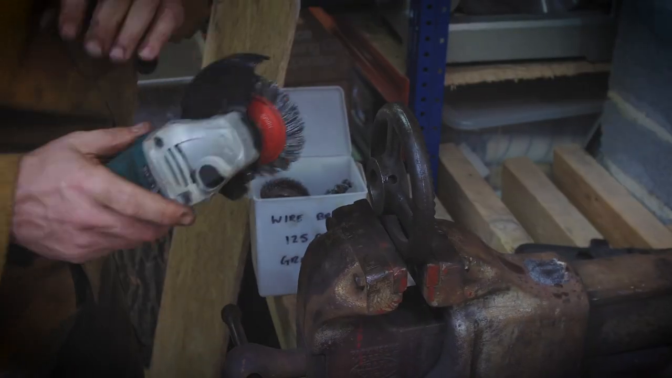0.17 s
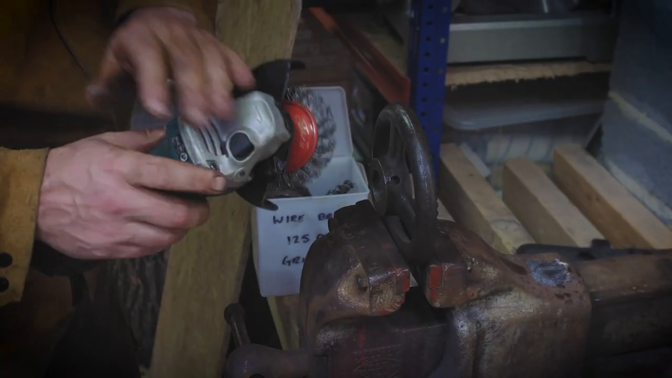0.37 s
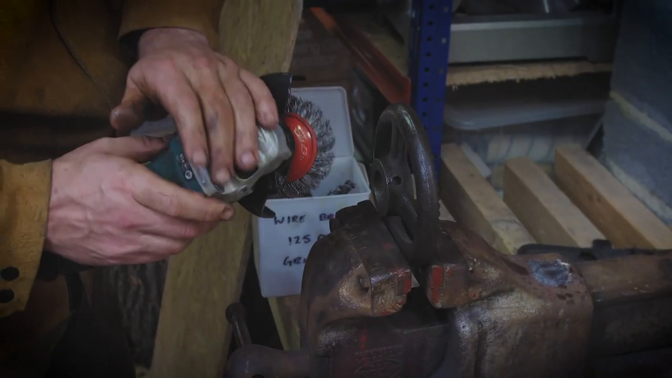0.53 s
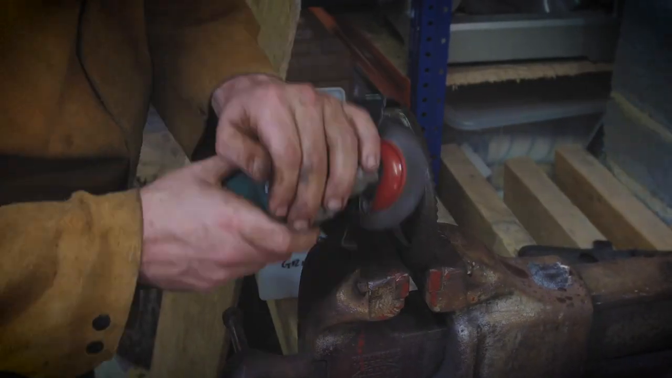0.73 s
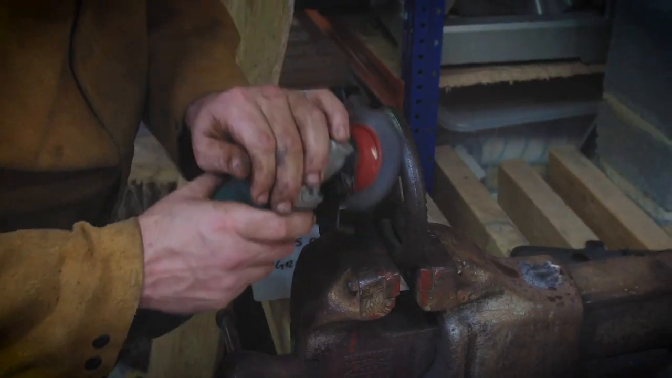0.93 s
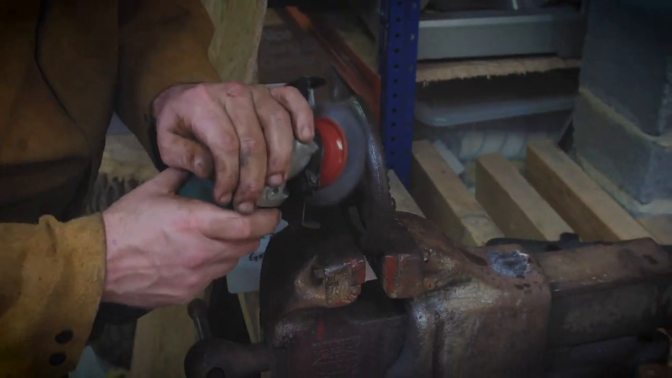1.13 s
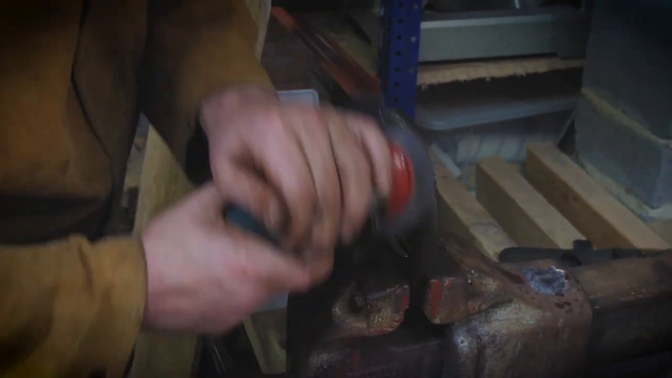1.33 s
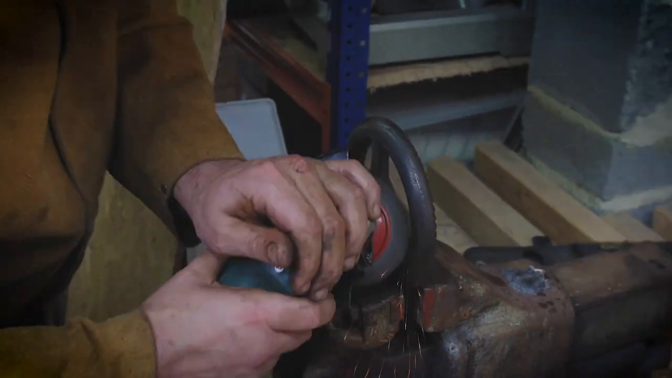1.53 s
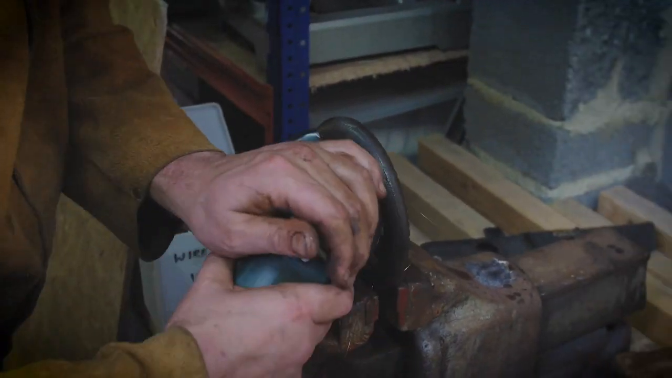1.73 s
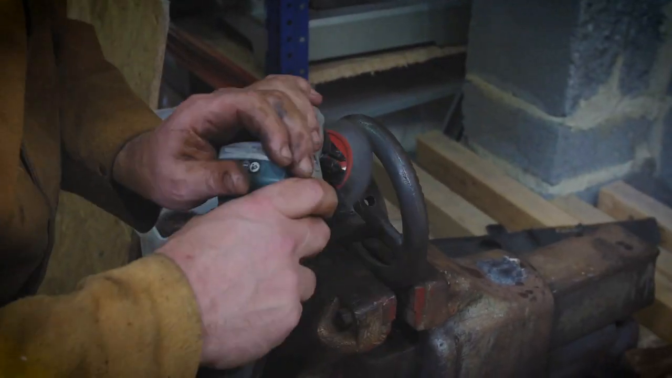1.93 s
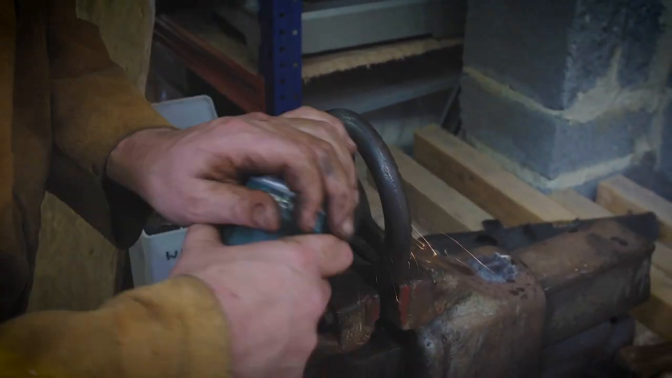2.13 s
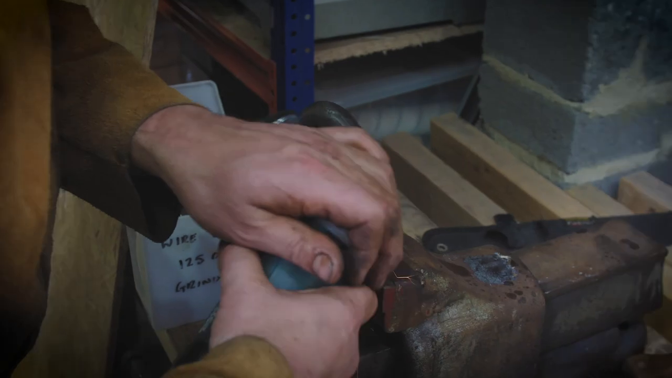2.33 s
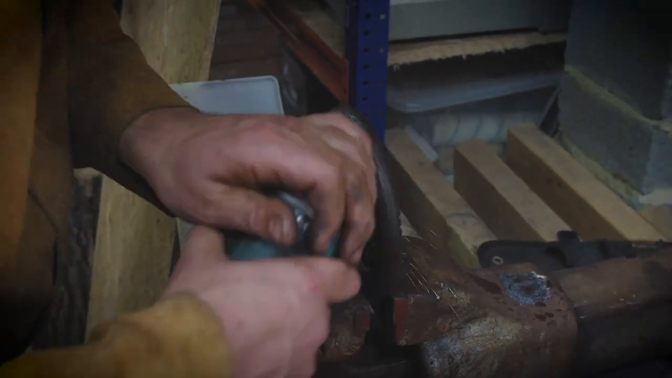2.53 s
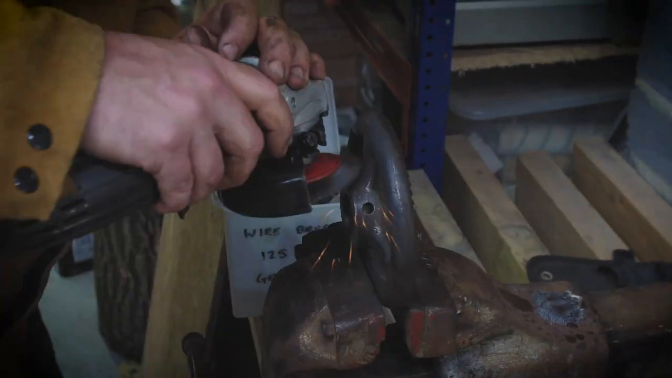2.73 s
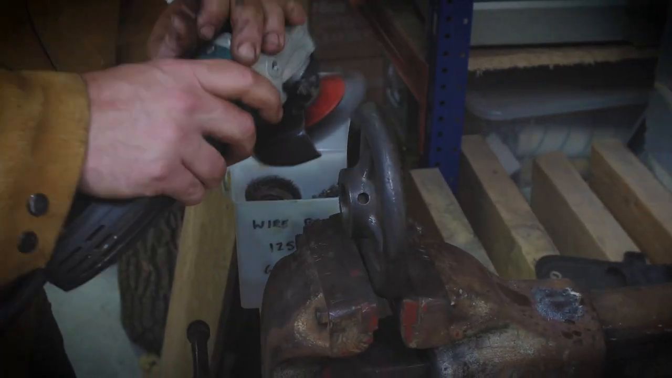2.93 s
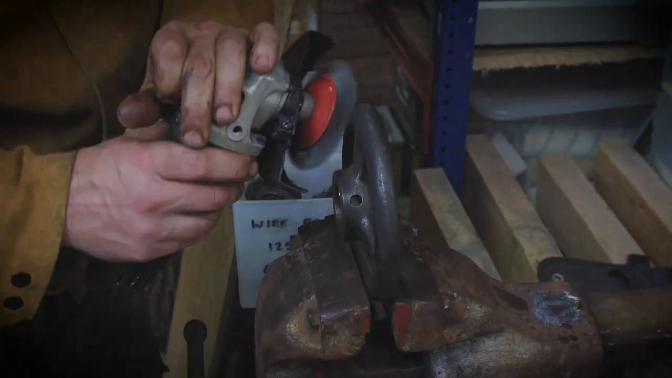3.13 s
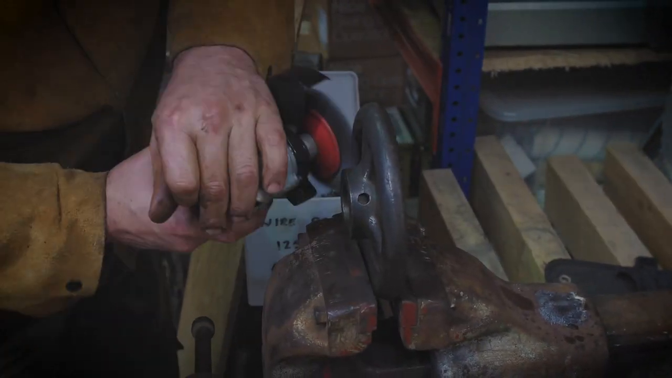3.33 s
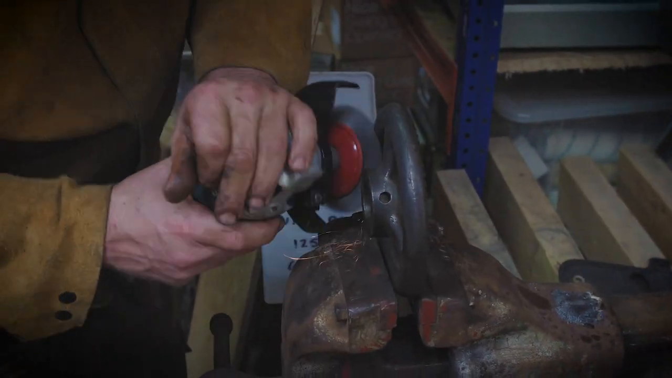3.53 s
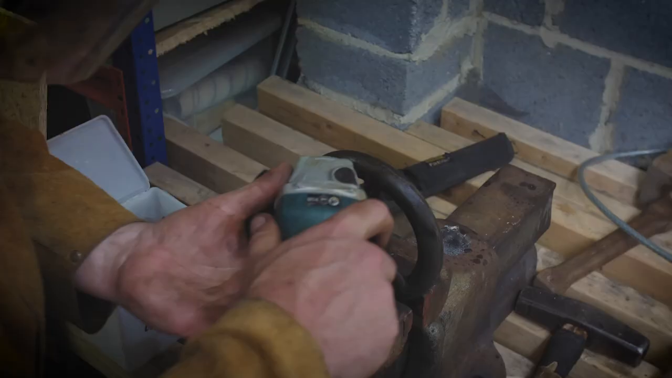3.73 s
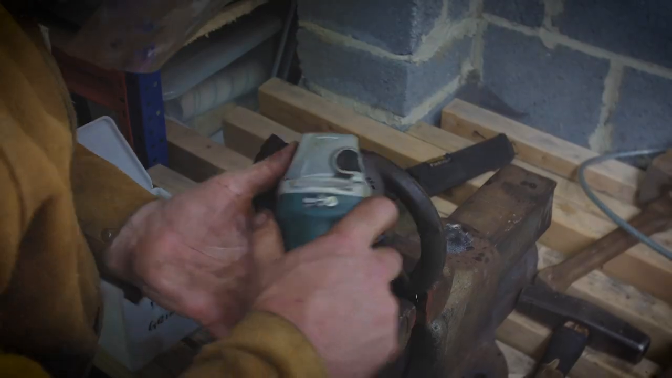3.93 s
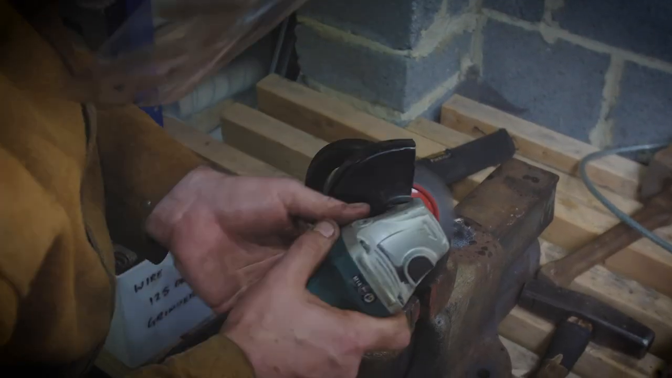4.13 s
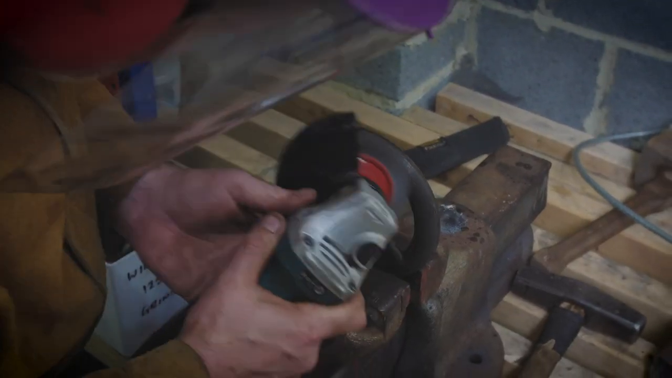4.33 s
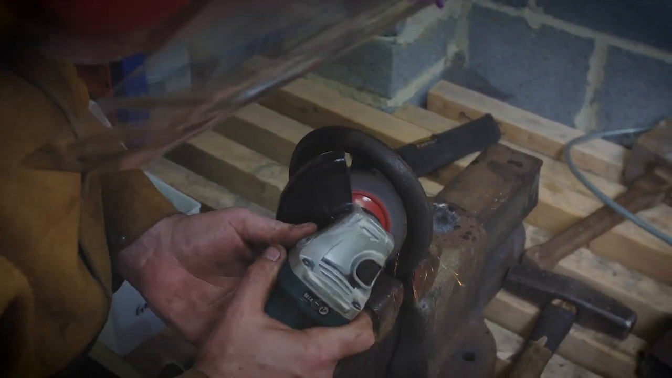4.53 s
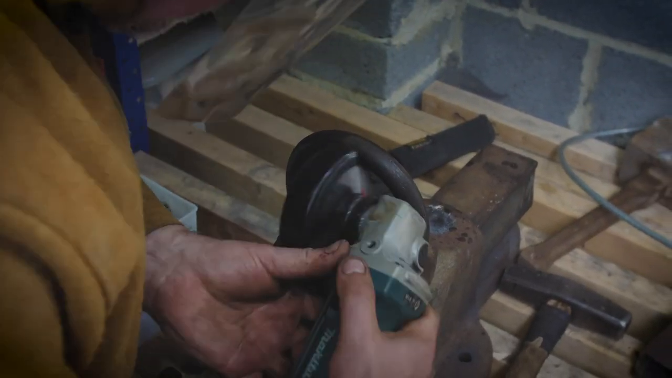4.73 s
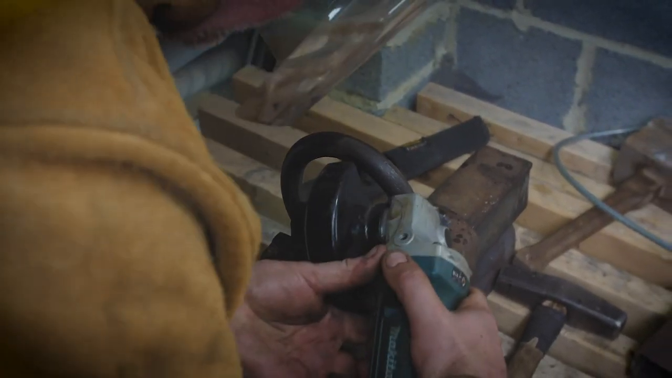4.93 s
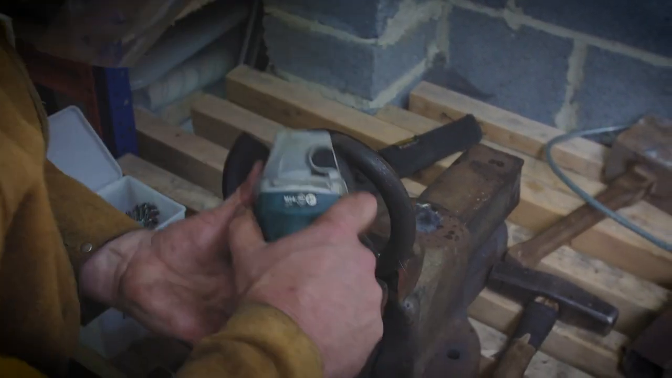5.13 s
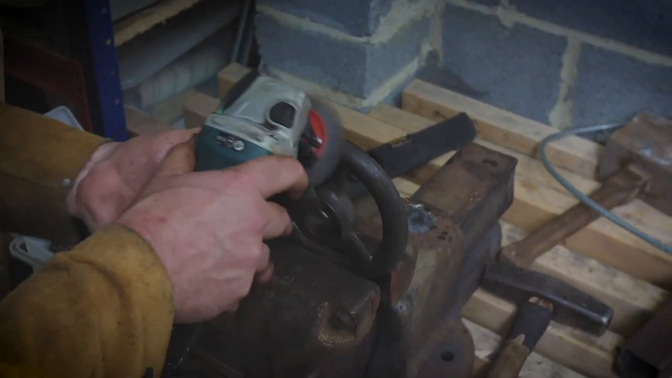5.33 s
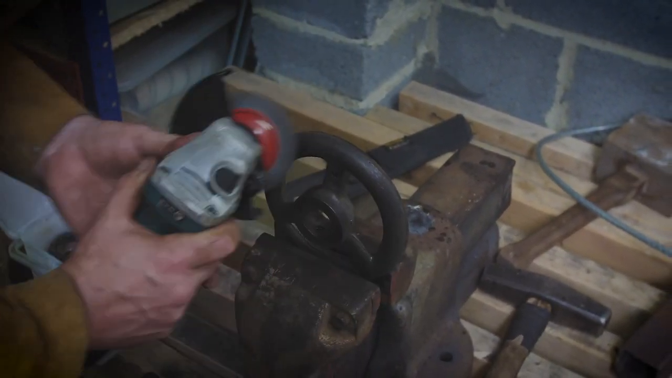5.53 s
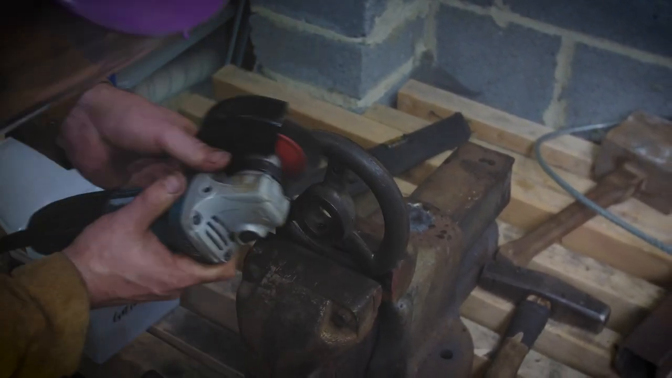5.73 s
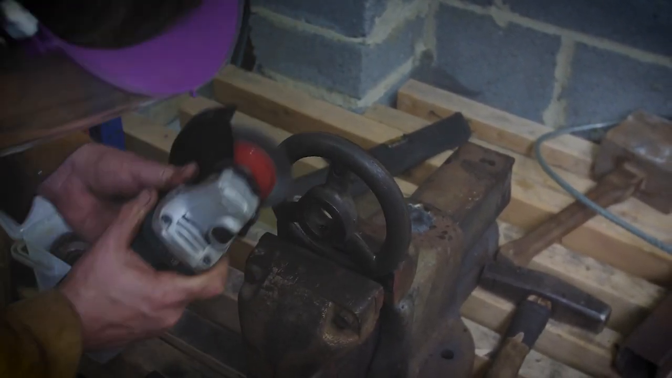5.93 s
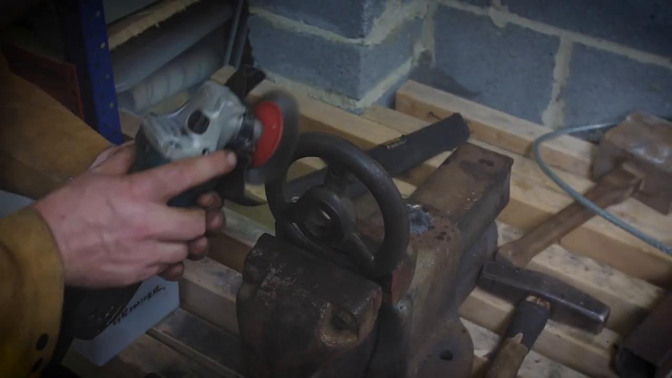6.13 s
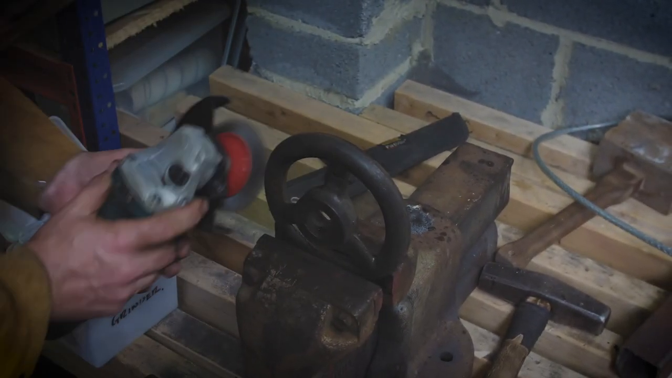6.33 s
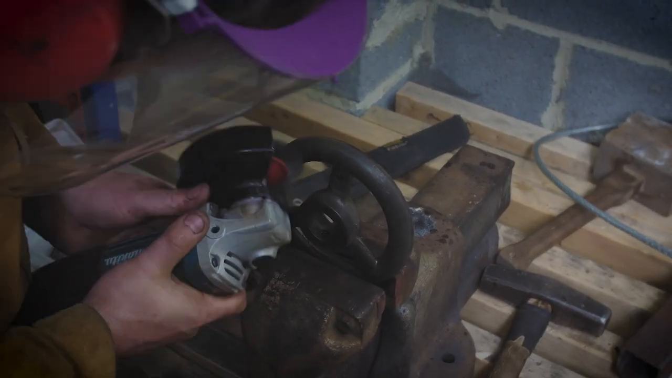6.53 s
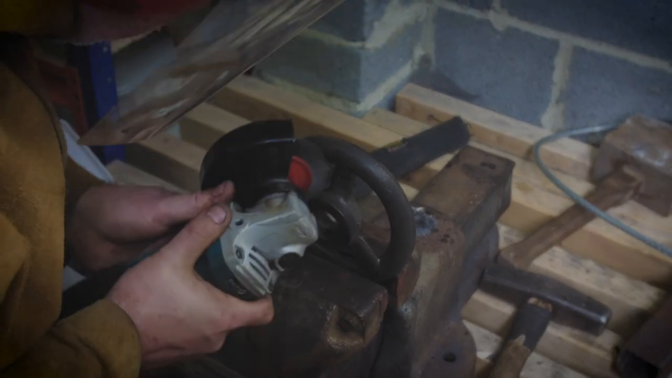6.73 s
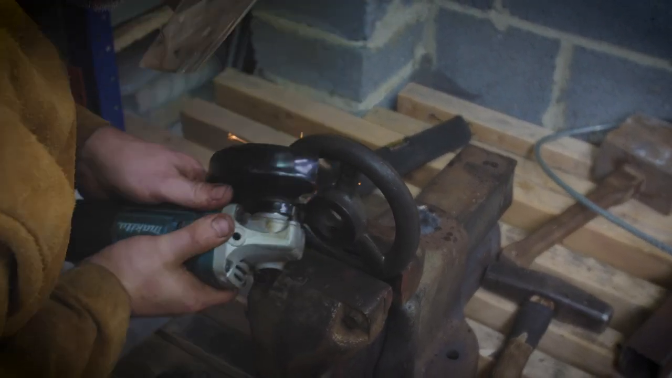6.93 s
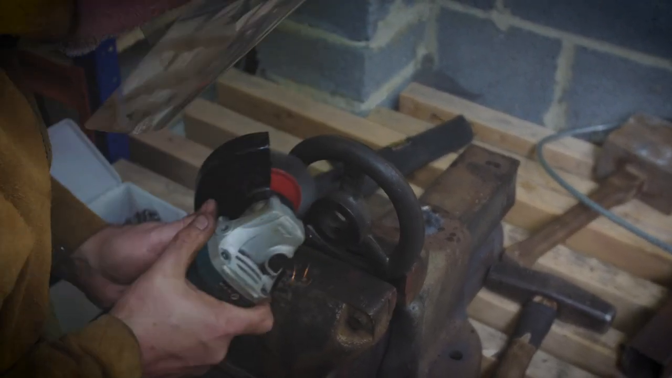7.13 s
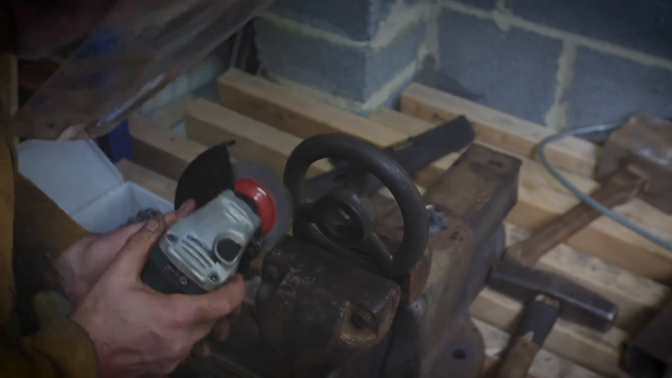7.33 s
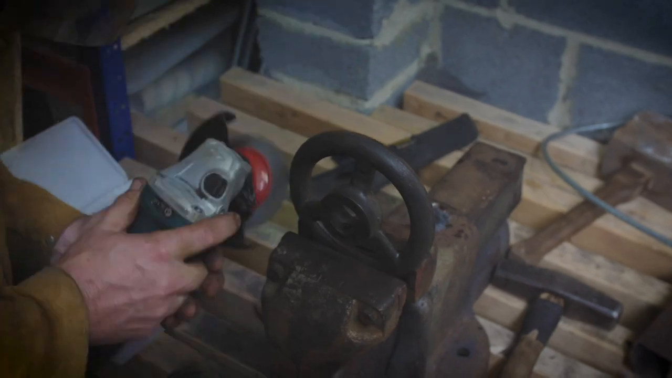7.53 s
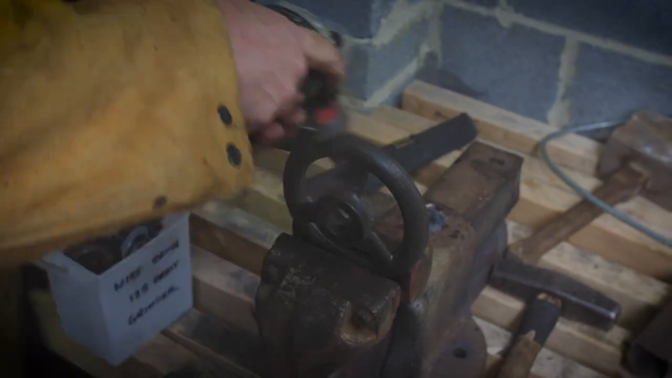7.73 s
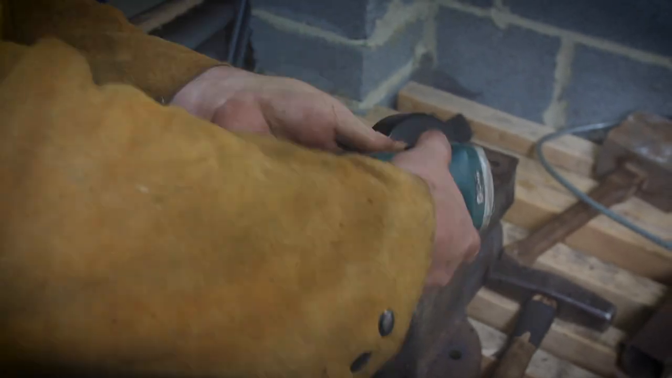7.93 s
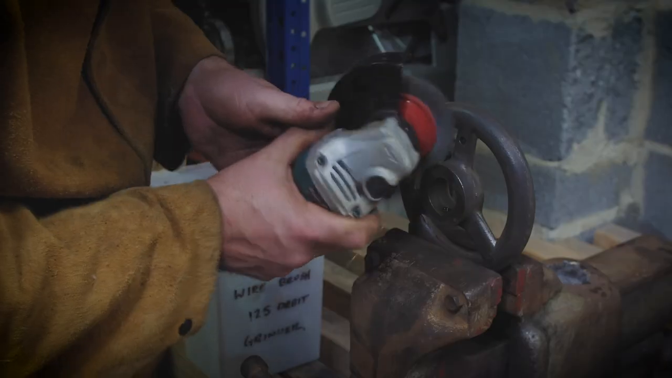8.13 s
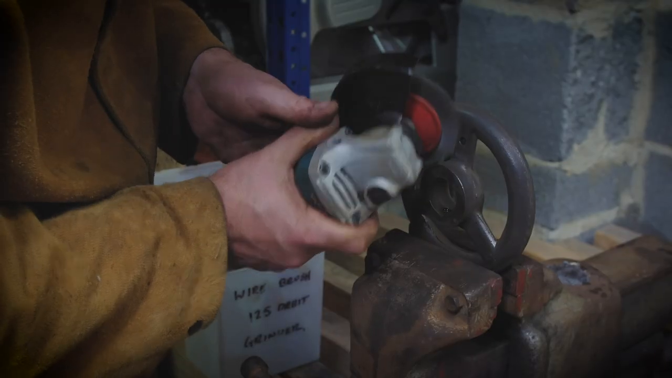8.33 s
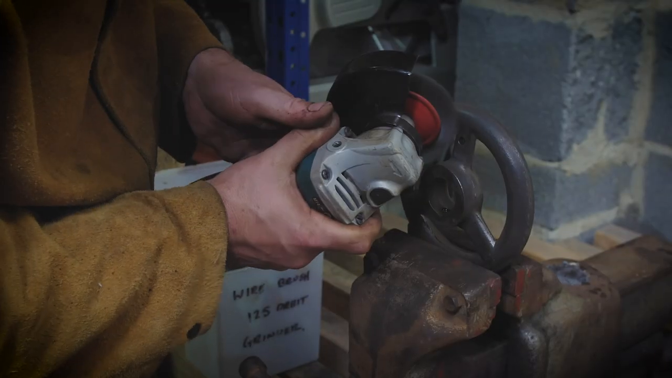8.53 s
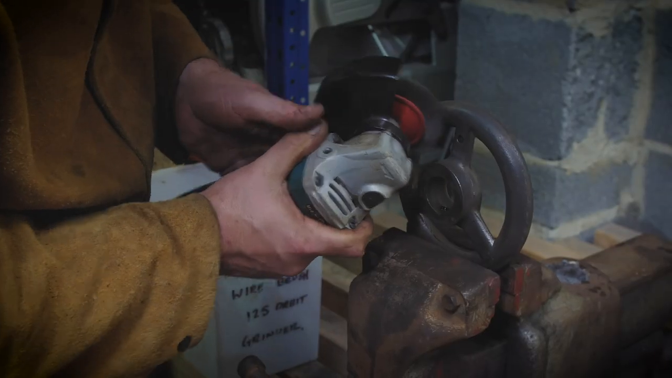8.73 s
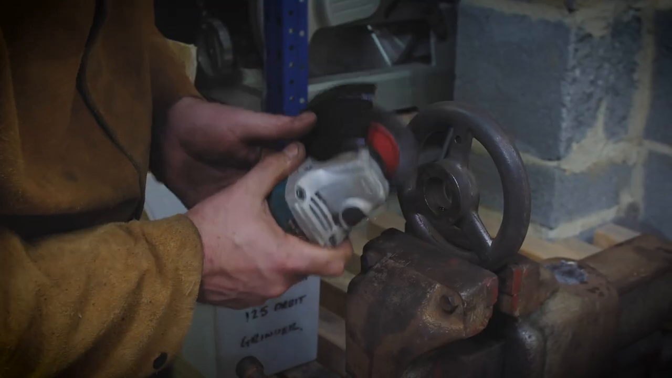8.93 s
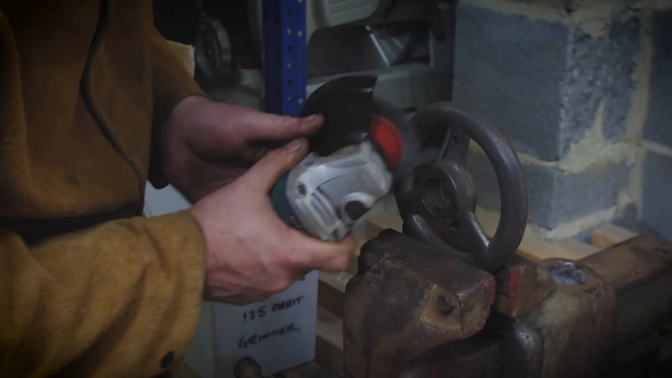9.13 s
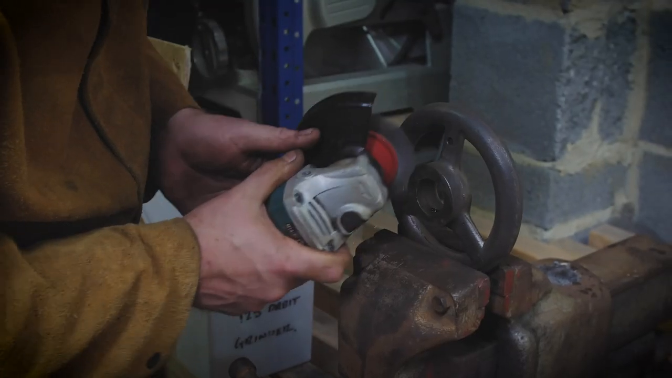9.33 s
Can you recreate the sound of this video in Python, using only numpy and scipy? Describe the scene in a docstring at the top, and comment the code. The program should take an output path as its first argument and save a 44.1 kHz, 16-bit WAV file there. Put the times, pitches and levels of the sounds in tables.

```python
"""A few clicks and the rub of a sleeve come first, as a hand takes hold of an angle grinder.
It snaps on, and its knotted wire wheel scours old grease off an iron handwheel held in a vice.
This part is sped up about six times, so it hisses and whistles, and the brushed iron sings.
Near the end the sound jumps to normal speed: the wire tips rasp, the gears hum and the motor
whines as its copper contact bars (the commutator) pass under the brushes."""
import sys
import numpy as np
from scipy import signal
from scipy.fft import rfft, irfft, next_fast_len
from scipy.io import wavfile
from scipy.ndimage import uniform_filter1d, map_coordinates

SR = 44100
rng = np.random.default_rng(int(sys.argv[2]) if len(sys.argv) > 2 else 0)


def wrap_up_sound(samples):
    """Save the sound to the file named by the first command line argument, as 16-bit audio."""
    columns = np.atleast_2d(samples).T
    # keep every value between -1 and 1, then stretch to whole-number steps
    tamed = np.clip(columns, -1, 1)
    steps = np.round(tamed * 32767).astype(np.int16)
    wavfile.write(sys.argv[1], SR, steps)


N = 413658

GEAR_RATIO = 37 / 10  # motor turns for each turn of the wheel
HANDLING_END_S, SWITCH_ON_S, FAST_END_S, NORMAL_START_S = .64, .683, 8.119, 8.136
SPIN_UP_S, CONTACT_S = 0.055, 0.14  # fade-in times: the motor's lowest tone, all other tones
STROKE_DB = 3  # how far each stroke of the hands swings the high tones

# Tone colour of wires on iron, sped up: pitch_hz, gain_db
FAST_WIRE_COLOUR = [(200, -59.5), (320, -54.5), (600, -28), (1000, -21.5), (1700, -19), (2600, -10.5),
                    (3100, -7), (3450, -8.5), (3950, -2.5), (5200, -4.5), (7000, 2.5), (8600, 3),
                    (12000, 2), (15800, 2)]
# A wheel tone sings out or sinks at some angle of contact: start_s, end_s, speed_multiple, gain_db
WHEEL_TONE_FLARES = [(.8, 1.4, 4, -2), (1.04, 1.23, 1, 7.5), (1.0, 1.23, 3, 4), (.95, 1.75, 2, 5.5),
                     (6.53, 7.3, 3, 3), (1.888, 2.1, 1, 4.5), (1.827, 1.94, 3, 7.5), (2.322, 3.2, 3, 5),
                     (3.2, 3.52, 18, 5), (3.29, 3.8, 2, 8.5), (3.302, 3.78, 5, 3.5), (4.35, 4.5, 6, 15),
                     (5.742, 6.083, 1, 7), (5.88, 6.14, 7, 13), (5.873, 6.136, 8, 18), (5.87, 6.14, 22, 8),
                     (6.147, 6.226, 18, 9.5), (6.53, 6.66, 7, 12), (7.14, 7.206, 7, 16),
                     (7.3, 7.356, 6, 18), (7.48, 7.624, 7, 17.5), (7.94, 8.095, 1, 10)]


def amp(db):
    """Turn decibels into a gain."""
    return 10 ** (np.asarray(db) / 20)


def unit(x):
    """Scale a signal to an average (rms) level of 1."""
    return x / np.sqrt(np.mean(x ** 2) + 1e-20)


def clock():
    """The time of each sample in seconds."""
    return np.arange(N) / SR


def curves(rows):
    """Join a table's points with lines: one curve for each column after the time."""
    times, *columns = np.transpose(rows)
    return [np.interp(clock(), times, column) for column in columns]


def after(time_s):
    """A quick step from 0 to 1."""
    return np.clip((clock() - time_s) / .004 + .5, 0, 1)


def held(start_s, end_s, edge_s=0.044):
    """1 between two times and 0 outside, with soft edges."""
    return np.clip(np.minimum(clock() - start_s, end_s - clock()) / edge_s + .5, 0, 1)


def bump(time_s, length_s):
    """A bell-shaped swell of height 1."""
    return np.exp(-2 * np.minimum(((clock() - time_s) / length_s) ** 2, 20))


def rise(length_s):
    """A fade from 0 to 1 that begins at switch-on."""
    return np.clip((clock() - SWITCH_ON_S) / length_s, 0, 1) ** 2


def wobble(rate):
    """A smooth curve through `rate` random points a second."""
    coarse = np.arange(0, N + 32, 32)
    points = rng.standard_normal(int(N * rate / SR) + 4)
    return np.interp(np.arange(N), coarse, map_coordinates(points, [coarse * rate / SR]))


def filtered(x, response):
    """Scale each frequency in x by response(hz)."""
    size = next_fast_len(N + 8192)
    return irfft(rfft(x, size) * response(np.fft.rfftfreq(size, 1 / SR)), size)[..., :N]


def colour(points, hz):
    """The gain at hz along a line through (pitch_hz, gain_db) points."""
    pitch_hz, gain_db = np.transpose(points)
    return amp(np.interp(np.log(hz + 1), np.log(pitch_hz), gain_db))


def noise(points):
    """Noise of level 1 with the given tone colour."""
    return unit(filtered(rng.standard_normal(N), lambda hz: colour(points, hz)))


def angle(speed):
    """Add up turns a second into an angle in radians."""
    return 2 * np.pi * np.cumsum(speed) / SR


def handling():
    """Hand and sleeve rub along the idle tool in the quiet workshop."""
    # How loud the sliding is: time_s, rub_db, rustle_db
    slide_levels = [(0.0, -65, -63), (0.19, -65.5, -64), (0.265, -55, -60), (0.45, -60.5, -64),
                    (0.475, -72, -67.5), (0.63, -79, -71)]
    # A falling swish among the rubbing: time_s, pitch_hz, level_db
    swish_path = [(.26, 890, -75), (.3, 770, -61), (.36, 660, -56), (.41, 486, -58), (.45, 442, -55),
                  (.48, 430, -72)]
    # Tone colours of hand, sleeve and room: pitch_hz, gain_db
    rub_colour = [(35, -52), (60, -22), (113, -9), (310, 0.5), (434, -4), (669, -3), (1040, -11),
                  (1500, -27), (1950, -62), (3300, -120)]
    rustle_colour = [(530, -35), (900, -4), (1680, -2), (2100, -3), (3480, -2.5), (5320, -18), (12600, -25),
                     (15000, -31)]
    room_colour = [(25, -21), (60, -22), (105, 4), (200, -5), (500, -15), (1500, -31), (4000, -21),
                   (6000, -32), (15000, -40)]
    rub_db, rustle_db = curves(slide_levels)
    swish_hz, swish_db = curves(swish_path)
    narrow_noise = np.real((wobble(131.8) + 1j * wobble(130.4)) * np.exp(1j * angle(swish_hz)))
    swish = amp(swish_db) * unit(narrow_noise)
    rub = amp(rub_db + 2) * noise(rub_colour)
    rustle = amp(rustle_db + 1.4 * wobble(81)) * noise(rustle_colour)
    sound = rub + rustle + swish + clicks() + amp(-65.5) * noise(room_colour)
    return sound * (1 - after(HANDLING_END_S))


def clicks():
    """Guard and casing click in the hand: a crack, a brief ring and a short echo of the workshop."""
    # Each click: start_s, level_db, pitch_hz
    knocks = [(0.0344, -33.5, 2240), (0.084, -31, 3720), (0.09, -32.5, 3300), (0.106, -41, 4160),
              (0.147, -32, 3050), (0.2776, -35.5, 2950)]
    # Tone colour of the casing: pitch_hz, gain_db
    casing_colour = [(300, -21), (1200, 2), (1700, -3), (2500, 3), (3600, 4), (5500, -14), (8000, -26),
                     (15000, -45)]
    out = np.zeros(N)
    for start_s, level_db, pitch_hz in knocks:
        age = np.maximum(clock() - start_s, 0)
        echo = amp(-13 - 60 * age / 0.18)
        crack = noise(casing_colour) * (amp(-60 * age / 0.017) + echo)
        ring = 1.8 * np.sin(2 * np.pi * pitch_hz * age) * amp(-60 * age / 0.022)
        out += amp(level_db - 10.5) * (crack + ring) * (age > 0)
    return out


def switch_ticks():
    """Sharp ticks as the switch snaps and the gears take up their slack."""
    # Each tick: start_s, level_db, decay_s (time to fall 60 dB)
    ticks = [(.641, -83, .3), (.655, -64, 0.029), (.66, -56, 0.03), (.678, -34, .06), (0.685, -33, .014),
             (0.698, -35.5, .012), (.737, -29, 0.022)]
    loudness = sum(amp(db - 60 * np.abs(clock() - start_s) / decay_s) * (clock() > start_s)
                   for start_s, db, decay_s in ticks)
    return loudness * noise(FAST_WIRE_COLOUR)


def grinder_fast():
    """The sped-up grinder at work: every tone and every tremble is about six times higher."""
    # Wheel speed, sagging under pressure: time_s, turns_per_s
    wheel_speeds = [(0.69, 463), (0.73, 550), (0.77, 747), (0.83, 846), (1.11, 877), (1.25, 866),
                    (1.32, 816), (1.63, 862), (1.74, 819), (1.87, 667), (2.0, 829), (2.06, 822),
                    (2.14, 796), (2.22, 870), (2.3, 782), (2.74, 789), (2.91, 757), (2.97, 828),
                    (3.07, 831), (3.13, 778), (3.54, 793), (3.66, 731), (3.77, 851), (3.81, 792),
                    (3.95, 732), (4.05, 816), (4.2, 766), (4.41, 746), (4.53, 814), (4.71, 814),
                    (4.77, 754), (4.86, 775), (5.0, 705), (5.26, 785), (5.4, 696), (5.67, 704), (5.93, 676),
                    (6.21, 719), (6.39, 715), (6.49, 845), (6.73, 608), (6.89, 684), (7.03, 655),
                    (7.23, 684), (7.42, 805), (7.51, 777), (7.64, 780), (7.72, 753), (7.78, 811),
                    (7.83, 777), (7.88, 814), (7.96, 768), (8.03, 790), (8.1, 748)]
    speed, = curves(wheel_speeds)
    load = pressure(speed)
    # The hands rock the tool: on each stroke the wires bite, sing and drag the speed down.
    rocking = angle(15 + 2 * wobble(5))  # about 15 strokes a second
    bite = np.sin(rocking)
    tremble = 0.0089 * np.cos(rocking) + .003 * wobble(80)
    wheel = angle(speed * (1 + tremble))
    singing = wheel_hum(wheel, load) + motor_whine(wheel, load, bite) + wire_knots(wheel, load, bite)
    running = singing + scouring_fast(wheel, speed, bite) + iron_ringing() + snags()
    return switch_ticks() + running * after(SWITCH_ON_S) * (1 - after(FAST_END_S))


def pressure(speed):
    """How hard the wheel is pressed on, from -1 to 1: pressing makes its speed sag and brake."""
    usual_speed = uniform_filter1d(speed, int(0.64 * SR), mode="nearest")
    sag = 1 - speed / usual_speed
    braking = -np.gradient(uniform_filter1d(np.log(speed), size=SR // 20)) * SR
    return np.tanh(sag / 0.15 + braking)


def tone_levels(rows, flares, load):
    """Each tone's multiple and changing level: it follows the pressure, fades and flares at set times."""
    fade_db = -.5 * (clock() - SWITCH_ON_S)  # the tool is slowly turned away
    levels = []
    for multiple, level_db, pressed_db in rows:
        flare_db = sum(db * held(start_s, end_s) for start_s, end_s, k, db in flares if k == multiple)
        levels.append((multiple, level_db + pressed_db * load + fade_db + flare_db))
    return levels


def tones(shaft, levels, flutter_db, blur, rate, swell_db=1):
    """Tones at multiples of a shaft's speed; each swells, flutters and wavers in phase (blur, radians)."""
    out = np.zeros(N)
    for multiple, db in levels:
        gain = np.sqrt(2) * amp(db + flutter_db * wobble(rate) + swell_db * wobble(6))
        out += gain * np.sin(multiple * shaft + blur * wobble(rate))
    return out


def motor_whine(wheel, load, bite):
    """The motor's spinning core sings once a turn, with a higher whine above it."""
    # Tones of the core and of the whine: speed_multiple, level_db, full_pressure_gain_db
    core_tones = [(1, -48.5, 0)]
    whine_tones = [(3, -51.5, -1.5), (4, -43.5, 0.39)]
    # A tone stands out or sinks as the tool is turned: start_s, end_s, speed_multiple, gain_db
    flares = [(.735, 0.784, 1, 6), (.85, 1.4, 1, -1), (1.95, 2.08, 1, 4.5), (2.07, 2.257, 4, 12),
              (2.2, 2.296, 1, 10), (2.25, 2.7, 3, 2), (2.4, 2.9, 1, 3.5), (2.75, 3.02, 4, 10.5),
              (3.82, 4.05, 4, 10), (3.817, 5.32, 1, 5.5), (4.88, 5.12, 4, 8), (5.85, 6.404, 3, 12),
              (6.55, 7.33, 4, 8.5), (6.55, 7.5, 1, 2), (7.683, 8.12, 1, 10)]
    motor = GEAR_RATIO * wheel
    core_levels = tone_levels(core_tones, flares, load)
    whine_levels = tone_levels(whine_tones, flares, load)
    core = tones(motor, core_levels, flutter_db=2.5, blur=0.78, rate=90, swell_db=1.6)
    whine = tones(motor, whine_levels, flutter_db=1, blur=.8, rate=220, swell_db=1.5)
    return rise(SPIN_UP_S) * core + rise(CONTACT_S) * amp(STROKE_DB * bite) * whine


def wheel_hum(wheel, load):
    """The spinning wheel hums at low multiples of its speed."""
    # Tones of the wheel: speed_multiple, level_db, full_pressure_gain_db
    hum_tones = [(1, -56, -1.5), (2, -58.5, -0.5), (3, -52, 0.5), (4, -52.5, 0.5), (5, -56, -3),
                 (6, -58.5, -3), (7, -53, -4.5), (8, -60, -2), (9, -51, -2)]
    levels = tone_levels(hum_tones, WHEEL_TONE_FLARES, load)
    return rise(CONTACT_S) * tones(wheel, levels, flutter_db=3, blur=0.48, rate=80, swell_db=2.3)


def wire_knots(wheel, load, bite):
    """Eighteen knots of wire pass each turn; their uneven lengths add tones on either side."""
    # Tones of the knots: speed_multiple, level_db, full_pressure_gain_db
    knot_tones = [(14, -60.5, 3), (15, -50.5, 3), (16, -51.5, 3.5), (17, -46.5, 5.3), (18, -41, 5.1),
                  (19, -46.5, 4), (20, -45, 4.5), (21, -47, 3), (22, -47, 3)]
    # The knots dig in and all their tones shimmer: start_s, end_s, gain_db
    digs = [(1.26, 1.32, 4), (1.7, 1.838, 5), (3.12, 3.7, 4), (3.75, 3.8, 12), (4.14, 4.376, 6.5),
            (4.72, 5.12, 2), (5.33, 6.4, 4.5), (7.45, 7.72, 4), (7.88, 7.98, 6)]
    dig_db = sum(db * held(start_s, end_s) for start_s, end_s, db in digs)
    gain = rise(CONTACT_S) * amp(dig_db + 3.7 * wobble(35) + STROKE_DB * bite)
    levels = tone_levels(knot_tones, WHEEL_TONE_FLARES, load)
    return gain * tones(wheel, levels, flutter_db=1, blur=0.67, rate=130, swell_db=-0.3)


def scouring(shaft, levels, spectrum, trims_db, beat, grit, chatter_db, rate, patchy_db):
    """Countless wire tips flick the iron, harder once a turn and unevenly as the wheel chatters."""
    flicks = rng.standard_normal(N) * np.exp(grit * rng.uniform(-1.94, 1.53, N))
    each_turn = 1 + beat * np.cos(shaft + wobble(rate))
    chatter = amp(chatter_db * wobble(rate))
    flicks = wandering_contact(flicks * each_turn * chatter, patchy_db)
    edges_hz = [1, 2000, 6000, 10500, 40000]  # four soft-edged bands: body, rasp, hiss, fizz
    below = lambda hz, edge: 1 / (1 + (hz / edge) ** 20)
    out = np.zeros(N)
    for low, high, db, trim_db in zip(edges_hz, edges_hz[1:], levels, trims_db):
        band = filtered(flicks, lambda hz: colour(spectrum, hz) * (below(hz, high) - below(hz, low)))
        out += unit(band) * amp(db + trim_db)
    return out


def wandering_contact(x, patchy_db):
    """The tone colour drifts as the spot being brushed wanders."""
    spectra = signal.stft(x, nperseg=512)[2]
    drift = rng.standard_normal(spectra.shape)
    for _ in range(2):
        drift = uniform_filter1d(drift, size=3, axis=0)  # smooth across pitch
        drift = uniform_filter1d(drift, size=45, axis=1)  # and across time
    return signal.istft(spectra * amp(patchy_db * unit(drift)), nperseg=512)[1][:N]


def scouring_fast(wheel, speed, bite):
    """Sped-up scouring: brighter with speed, swung by each stroke, softer where the wheel lifts."""
    # The three lower bands: time_s, body_db, rasp_db, hiss_db
    band_levels = [(0.95, -52.5, -40, -33), (1.38, -53.5, -38.5, -32.5), (1.54, -49.5, -36.5, -34),
                   (1.69, -52.5, -37.5, -33.5), (1.95, -51.5, -37, -33), (2.44, -53, -38.5, -36),
                   (3.01, -54, -39.5, -35.5), (3.25, -53.5, -42.5, -34.5), (3.56, -49.5, -41, -35),
                   (3.89, -54.5, -38.5, -32), (4.42, -51.5, -40, -36), (4.62, -48, -37.5, -34.5),
                   (4.86, -53.5, -43, -34), (5.09, -55, -41, -32.5), (5.33, -53, -34.5, -32),
                   (5.62, -55.5, -42.5, -37.5), (6.39, -55.5, -42.5, -35), (6.74, -49.5, -39, -36),
                   (6.96, -52, -42, -37), (7.66, -54.5, -39, -34), (7.94, -54, -39, -33.5),
                   (8.0, -56, -41.5, -33)]
    # The wheel eases off the iron for a moment: time_s, gain_db, length_s
    lifts = [(0.886, -2, 0.032), (1.297, -2.5, 0.04), (1.82, -2, 0.069), (3.787, -5.5, 0.013),
             (5.35, -3, 0.081), (5.57, -0.5, 0.03), (6.437, -1.5, 0.045)]
    body_db, rasp_db, hiss_db = curves(band_levels)
    octaves_up = np.log2(np.maximum(speed / np.median(speed), .85))
    fizz_db = -25 - 0.55 * (clock() - SWITCH_ON_S) + 4 * octaves_up
    levels = [body_db + 1.07 * wobble(25), rasp_db + 0.65 * wobble(25),
              hiss_db + .5 * wobble(25), fizz_db + 0.77 * bite]
    eased = amp(sum(db * bump(time_s, length_s) for time_s, db, length_s in lifts))
    return eased * scouring(wheel, levels, FAST_WIRE_COLOUR, trims_db=[-0.5, 0, -1, 0],
                            beat=0.14, grit=0.31, chatter_db=0.62, rate=90, patchy_db=1.96)


def iron_ringing():
    """The wires keep the iron ringing, at a pitch set by the spot being brushed."""
    # Each ring: start_s, end_s, pitch_hz, width_hz, level_db
    rings = [(0.75, 1.7, 9670, 600, -34.5), (1.794, 2.724, 4500, 260, -44), (1.95, 2.3, 11900, 450, -37),
             (2.25, 2.7, 8500, 100, -46), (3.8, 5.5, 7650, 230, -44.5), (3.8, 4.2, 11400, 400, -41),
             (7.1, 7.7, 6900, 230, -42)]
    out = np.zeros(N)
    for start_s, end_s, pitch_hz, width_hz, level_db in rings:
        band = filtered(rng.standard_normal(N), lambda hz: np.exp(-.5 * ((hz - pitch_hz) / width_hz) ** 2))
        fade = np.clip(np.minimum(clock() - start_s, end_s - clock()) / 0.035, 0, 1)
        out += amp(level_db) * unit(band) * fade
    return out


def snags():
    """Short growls where the wheel catches an edge and judders."""
    # Each catch: time_s, level_db, length_s
    catches = [(1.115, -47, .015), (1.349, -38.5, 0.009), (1.61, -40, 0.034), (1.69, -45, 0.032),
               (3.068, -41, 0.013), (3.768, -47, 0.024), (4.14, -41, 0.022), (4.22, -38, 0.011),
               (4.65, -40.5, 0.024), (4.723, -50, 0.037), (4.804, -46, 0.019), (5.505, -45, 0.042),
               (7.392, -49, 0.19), (7.768, -49, 0.043), (8.02, -44, 0.032)]
    # Tone colour of the judder: pitch_hz, gain_db
    judder_colour = [(100, -80), (200, -49), (450, -17), (800, 4), (1400, -1.5), (2500, 0.5), (5000, -26)]
    return sum(amp(db) * bump(time_s, length_s) for time_s, db, length_s in catches) * noise(judder_colour)


def grinder_normal():
    """At normal speed the wires rasp over the tones of wheel, gears and motor."""
    # Wheel speed: time_s, turns_per_s
    wheel_speeds = [(8.14, 132.3), (8.21, 134), (8.42, 131.6), (8.49, 132.4), (8.68, 126.4), (8.795, 121.3),
                    (8.88, 121.3), (9.124, 136.8), (9.25, 132.4), (9.37, 136.1)]
    # Tones of the wheel's shaft and the motor's shaft: speed_multiple, level_db
    wheel_tones = [(1, -58.5), (2, -63.5), (3, -56), (7, -53), (17, -51), (18, -41), (21, -43.5), (36, -53),
                   (37, -42), (38, -63)]
    motor_tones = [(1, -52.5), (3, -49), (4, -41), (7, -40.5), (8, -41.5), (9, -41), (11, -48.5), (13, -54),
                   (14, -55), (16, -57)]
    # How loud the scouring is: time_s, level_db
    scour_levels = [(8.16, -26), (8.3, -25), (8.55, -26), (8.7, -26), (8.93, -26), (9.0, -26.5),
                    (9.11, -25.5), (9.14, -23.5), (9.22, -25.5), (9.37, -25)]
    # Tone colour of wires on iron: pitch_hz, gain_db
    wire_colour = [(30, -62), (70, -45), (120, -23), (300, -19), (600, -13.5), (1200, -3), (1600, -8),
                   (2400, -6), (3150, -0.5), (4900, -9), (5500, -14), (7000, -16), (9000, -17.5),
                   (15500, -14)]
    speed, = curves(wheel_speeds)
    level_db, = curves(scour_levels)
    wheel = angle(speed * (1 + 0.00042 * wobble(30)))
    motor = GEAR_RATIO * wheel
    hum = tones(wheel, wheel_tones, flutter_db=5, blur=0.36, rate=25)
    whine = tones(motor, motor_tones, flutter_db=2.5, blur=.45, rate=35, swell_db=1.2)
    commutator = tones(motor, [(31, -49.5)], flutter_db=3.5, blur=.5, rate=160)  # 31 bars a turn
    rasp = scouring(wheel, [level_db] * 4, wire_colour, trims_db=[-9.5, -2.05, -16.5, -18],
                    beat=0.11, grit=0.42, chatter_db=0.3, rate=35, patchy_db=-0.5)
    fade_in = after(FAST_END_S) * amp(1820 * np.minimum(clock() - NORMAL_START_S - .003, 0))
    return (hum + whine + commutator + rasp) * fade_in


def scene():
    """Handling, sped-up grinding, then normal grinding, alike in both ears."""
    # Speeding up lifts all the bass out of the middle part.
    fast = filtered(grinder_fast(), lambda hz: 1 / (1 + (220 / (hz + 1)) ** 6))
    sound = handling() + fast + grinder_normal()
    return np.array([sound, sound])


def record(dry):
    """The treble falls away steeply just below 16000 Hz."""
    return filtered(dry, lambda hz: np.sin(np.pi / 2 * np.clip((16000 - hz) / 400, 0, 1)) ** 2)


dry = scene()
out = record(dry)
wrap_up_sound(out)
```